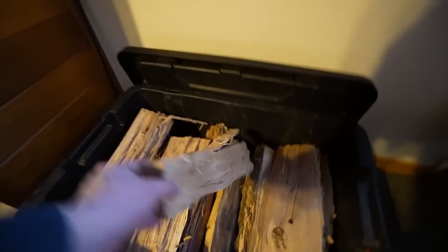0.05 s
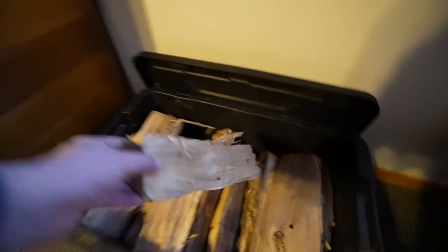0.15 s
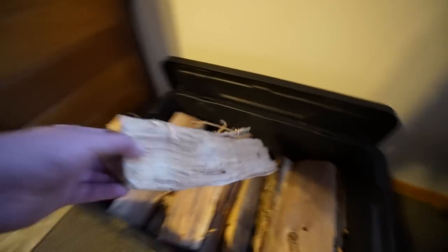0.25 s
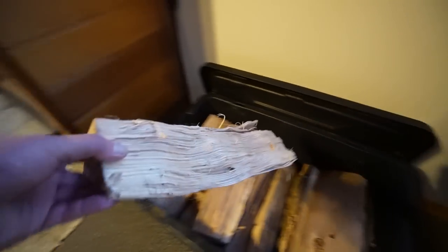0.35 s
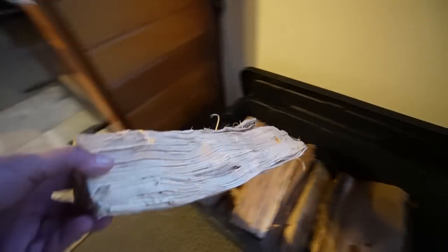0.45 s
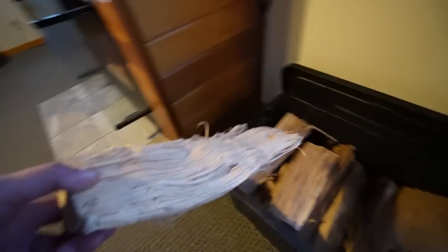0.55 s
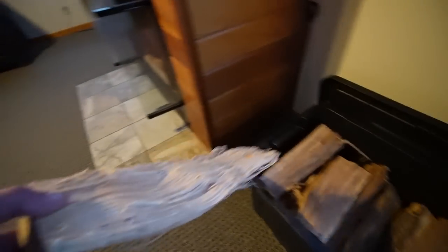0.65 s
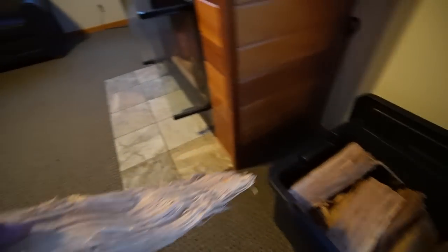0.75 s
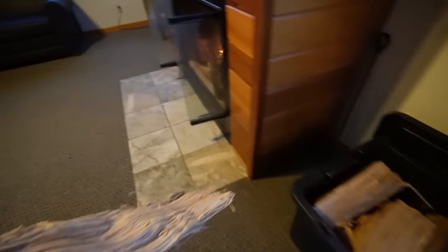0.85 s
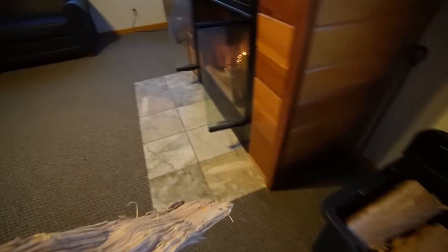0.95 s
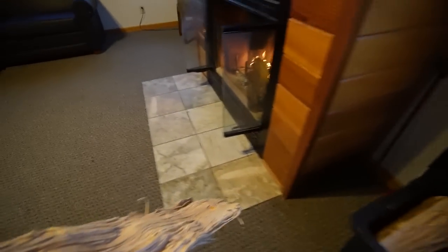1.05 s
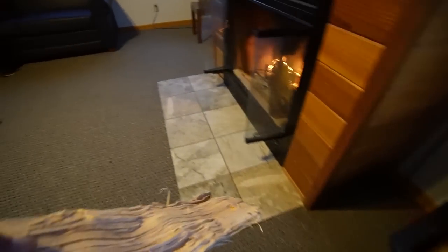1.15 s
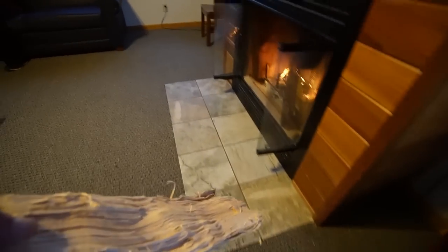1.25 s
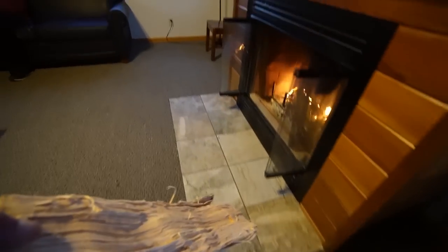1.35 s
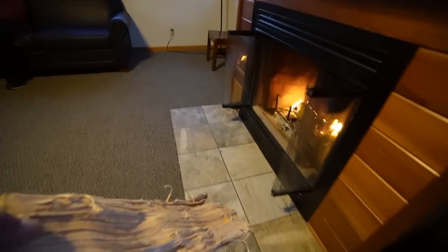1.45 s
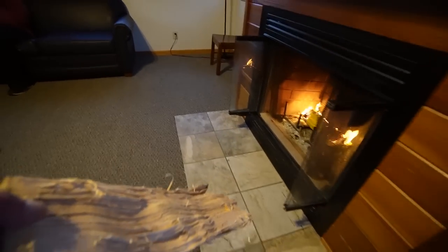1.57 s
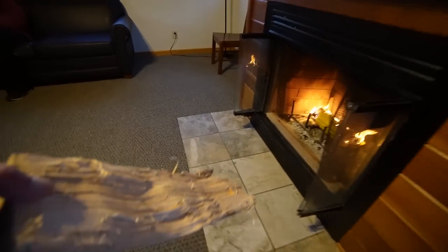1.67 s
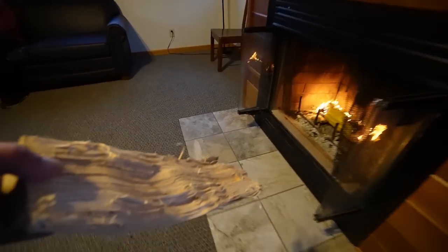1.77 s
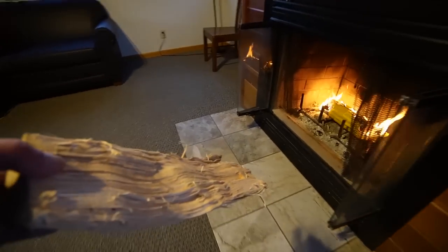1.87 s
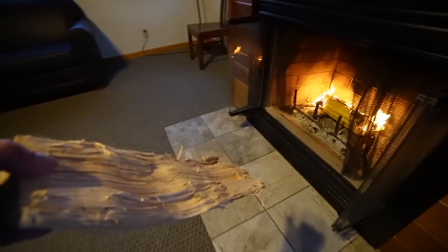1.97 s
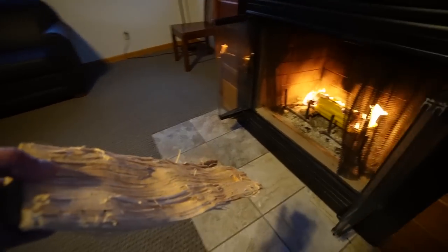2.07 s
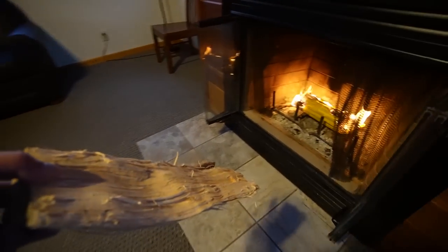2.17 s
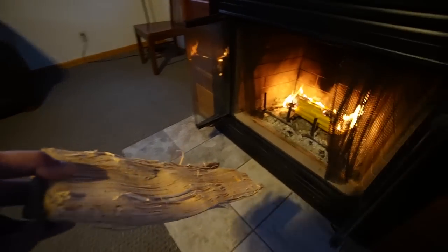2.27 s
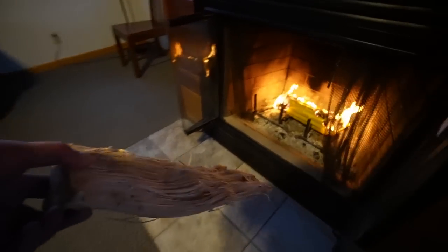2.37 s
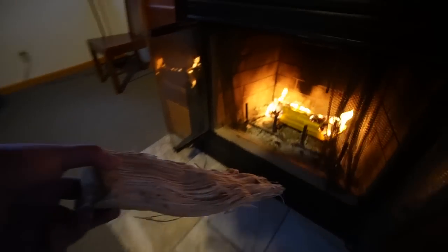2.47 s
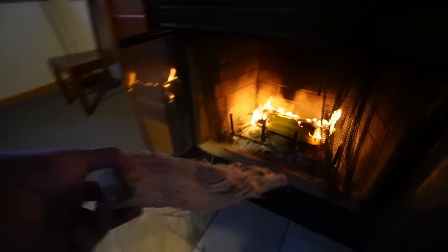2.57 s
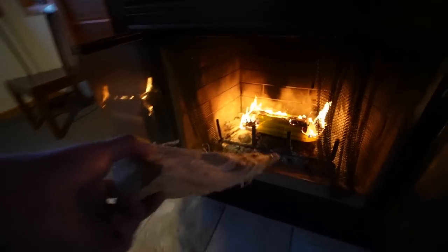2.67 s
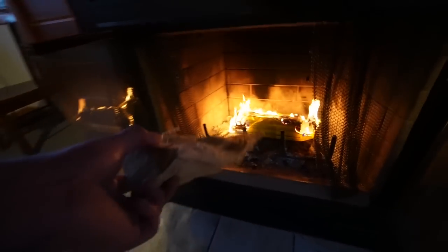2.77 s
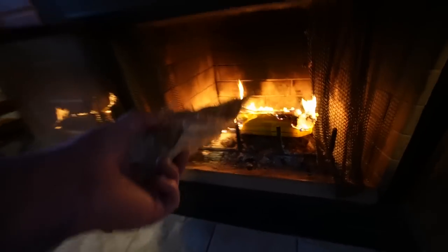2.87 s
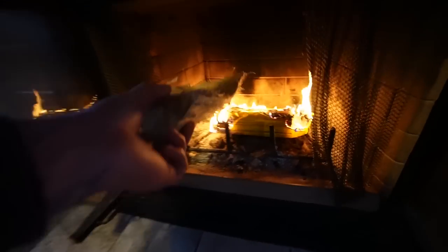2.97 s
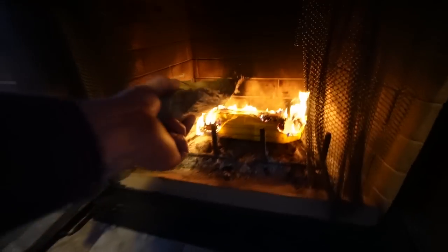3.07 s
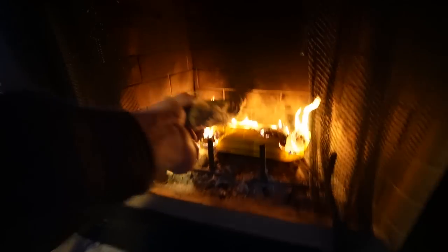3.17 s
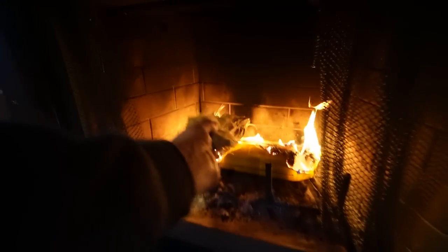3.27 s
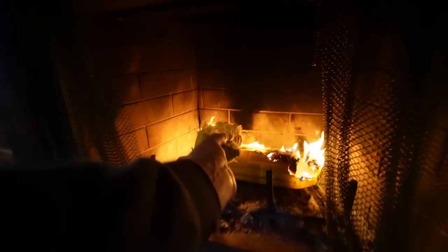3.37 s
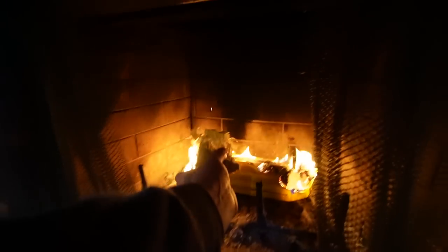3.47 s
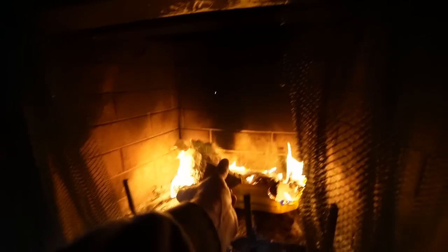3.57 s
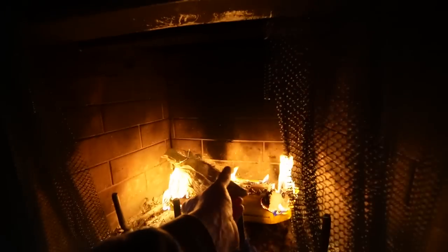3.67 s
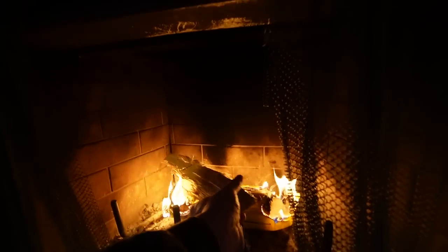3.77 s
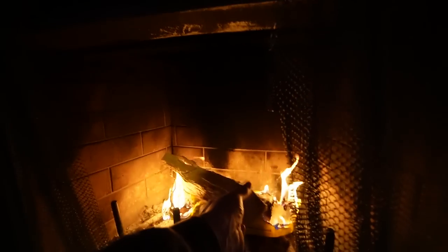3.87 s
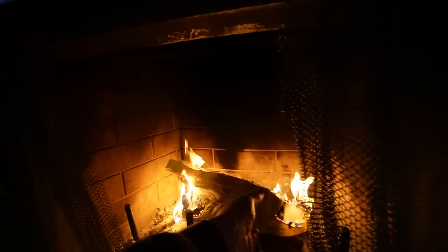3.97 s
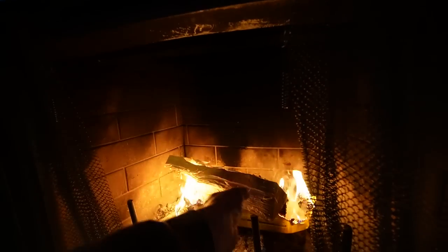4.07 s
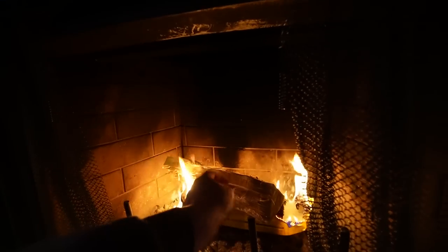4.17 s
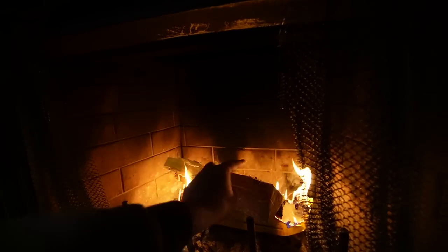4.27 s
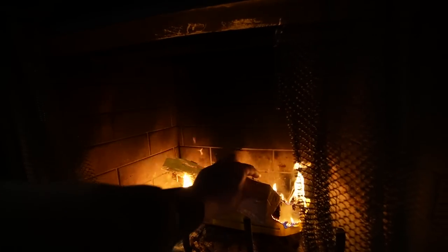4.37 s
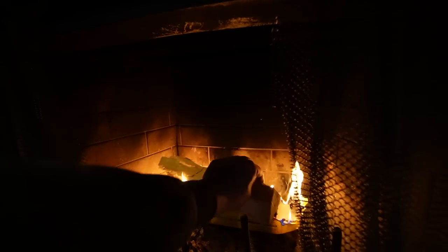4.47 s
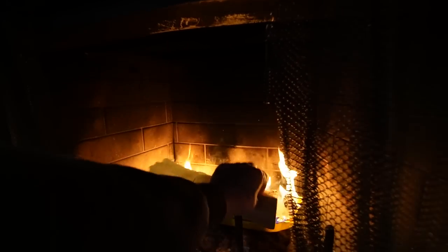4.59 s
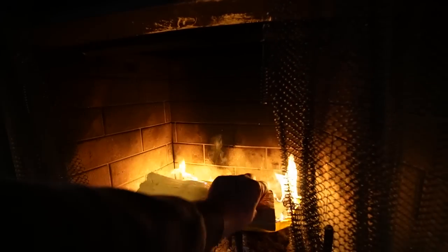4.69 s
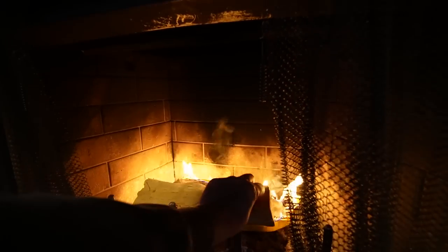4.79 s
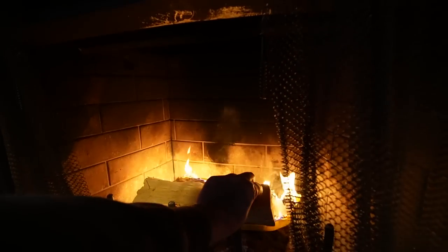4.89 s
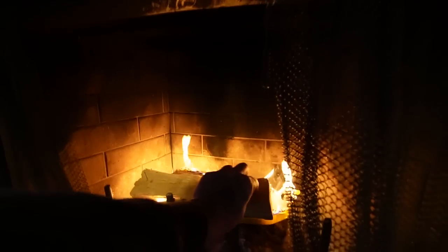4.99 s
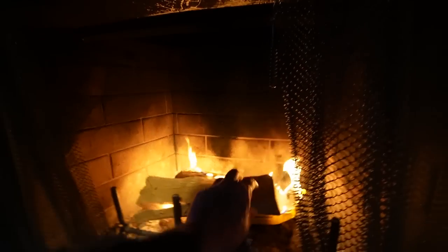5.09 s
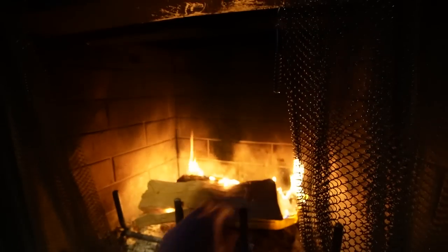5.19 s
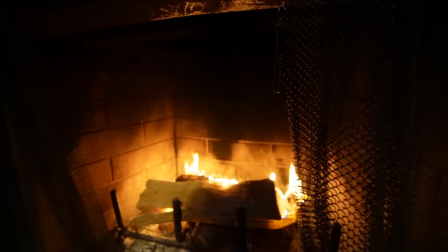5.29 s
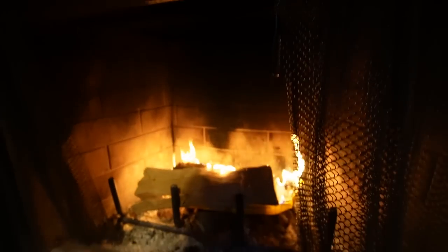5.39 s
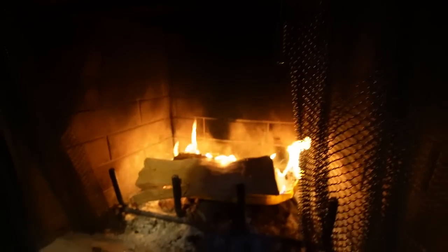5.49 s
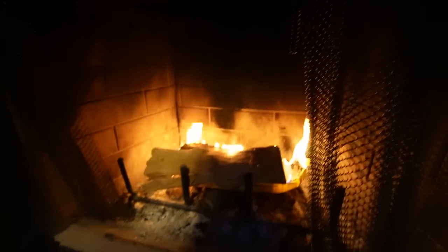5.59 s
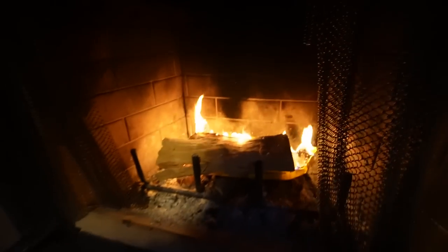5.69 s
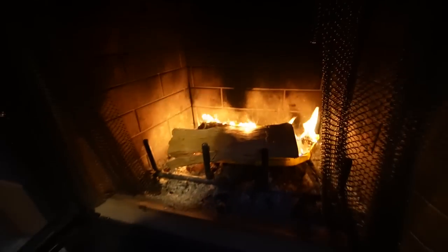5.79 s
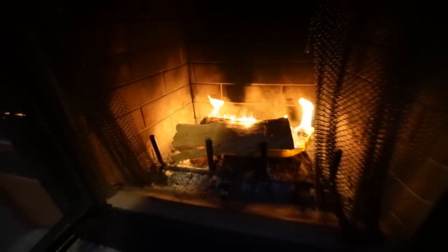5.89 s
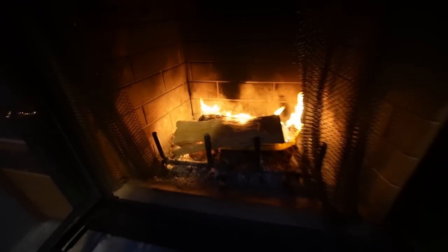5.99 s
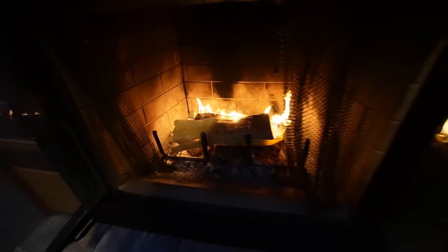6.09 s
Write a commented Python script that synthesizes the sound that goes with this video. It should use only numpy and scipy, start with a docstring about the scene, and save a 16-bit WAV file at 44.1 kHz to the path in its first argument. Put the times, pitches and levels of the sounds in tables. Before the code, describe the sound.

A dry split log clacks out of a bin, cloth swishes toward a crackling fire, then the log scrapes and knocks onto the burning grate.

```python
"""Log onto the fire

A split log is pulled from a bin, clacking on its neighbours, and carried to a burning fireplace.
Clacks, knocks, crackles: noise bursts through resonances; the log and sheet-metal firebox ring as modes.
Scrapes, fire and clothes: shaped noise under envelopes, over quiet air. A small living room answers most of it.
"""
import sys
import numpy as np
from scipy import signal
from scipy.fft import rfft, irfft, next_fast_len
from scipy.io import wavfile
from scipy.ndimage import map_coordinates

SR = 44100
rng = np.random.default_rng(int(sys.argv[2]) if len(sys.argv) > 2 else 0)


def put_to_file(sound):
    """Save the sound as 16-bit audio at rate SR, in the file named by the first command-line argument."""
    columns = np.atleast_2d(sound).T  # one column per channel
    safe = np.clip(columns, -1, 1)
    whole_steps = np.round(safe * 32767)
    wavfile.write(sys.argv[1], SR, whole_steps.astype(np.int16))


N = 270759  # samples

# All levels are relative.
# dry logs rub and strike each other in the bin: [t/s, level/dB, ring level/dB, contact t60/s]
CLACKS = [(.001, -38, -23, 0.48), (.037, -30.5, 2.5, 0.11), (0.055, -32.5, -0.5, 0.2),
          (.089, -29, 4, 0.089), (0.1662, -18.5, -19, 0.053), (0.1716, -13.5, -6.5, 0.058),
          (.191, -9.5, -4.5, 0.03), (.215, -20, -0.5, 0.032)]
# modes of the split log: [f/Hz, level/dB]
LOG_MODES = [(1087, -42.5), (1200, -37.5), (1518, -47.5), (1690, -58), (2299, -55), (2460, -60),
             (2503, -46), (2977, -69), (3198, -58), (3505, -64), (3989, -58), (4097, -71), (4307, -59),
             (4823, -71), (5060, -53), (5109, -57), (5335, -49), (5604, -51), (5965, -62), (6487, -58)]
# how long the log rings: [f/Hz, t60/s]
LOG_DECAY = [(1200, .15), (2500, .14), (6000, .1)]
# spectrum of the cracking contact: [f/Hz, level/dB]
CLACK_COLOUR = [(240, -66), (400, -35.5), (906, -16), (1200, -1.5), (1350, -9.5), (2020, -9.5), (2220, -3),
                (2750, -9), (4440, -8), (5350, -14.5), (6640, -16), (10700, -29), (16000, -44.5)]

# pushes of the log over wood and embers:
# [t/s, length/s, final level/dB, swell/dB, release t60/s, crunch over rasp/dB]
PUSHES = [(3.435, 0.37, -50, -2.5, .15, -19.5), (3.83, 0.077, -38.5, 8.5, .22, -15.5),
          (3.94, 0.073, -36, 8.5, 0.15, -14), (4.0, .11, -39.5, 2.5, 0.41, -6),
          (4.512, 0.036, -38, 13.5, .2, -15.5), (4.59, 0.15, -31.5, 16.5, 0.23, -16),
          (4.78, 0.07, -35, 4.5, 0.22, -13.5), (4.97, 0.15, -46.5, 6, 0.068, -13.5),
          (5.13, 0.036, -46, -4, 0.25, -9)]
PUSH_ATTACK_S = 0.004
# spectrum of the rasping grain: [f/Hz, level/dB]
RASP_COLOUR = [(400, -9.5), (900, -34), (1250, -7), (1600, -9), (2200, 0), (2750, 3), (3800, 2), (4700, 1),
               (6500, -0.5), (10000, -19), (16000, -53)]
# resonances of the sliding log that come and go as it catches: [f/Hz, width/Hz, level re rasp/dB]
CATCHES = [(1634, 140, -14.5), (2046, 200, -14), (2766, 180, -12), (3750, 310, -12.5), (4710, 190, -21.5)]
CATCH_RATE_HZ, CATCH_DEPTH_DB = 22, 7
# spectrum of crumbling embers: [f/Hz, level/dB]
CRUNCH_COLOUR = [(1500, -7), (4000, -7), (8000, 0.5), (11000, -6.5), (16000, -15)]
# wood and charcoal squeak as the log slides and settles: [t/s, length/s, f/Hz, width/Hz, level/dB]
SQUEAKS = [(3.728, 0.063, 1650, 200, -53.5), (3.829, 0.084, 4600, 910, -50), (3.893, 0.049, 1780, 350, -43),
           (3.905, 0.024, 2700, 600, -39), (3.97, 0.056, 1700, 300, -43), (4.682, 0.053, 1960, 380, -42.5),
           (4.735, 0.019, 4310, 450, -29.5), (4.842, .054, 3730, 1090, -38), (5.059, 0.051, 3710, 261, -42),
           (5.142, 0.025, 11750, 710, -45), (5.147, .022, 15000, 500, -43), (5.142, 0.057, 3970, 1400, -44)]

# a soft rub in the bin (the first two rows), then hollow knocks of wood and bumps on the hearth:
# [t/s, level/dB, f/Hz]
KNOCKS = [(0.496, -40, 1080), (0.505, -39, 1210), (1.072, -44, 730), (1.327, -43.5, 1170),
          (2.603, -37, 544), (2.868, -39.5, 230), (3.084, -28, 2370), (3.916, -18.5, 2500),
          (4.003, -30, 1850), (4.06, -23.5, 2200), (4.096, -22, 2630), (4.526, -30, 1940),
          (4.703, -19.5, 2070), (4.7592, -11.5, 1350), (4.7605, -20.5, 710), (4.821, -21, 2100),
          (4.878, -25, 1700), (5.658, -32.5, 1780)]
KNOCK_T60_AT_1KHZ_S, KNOCK_SLOPE = 0.039, 0.55  # deeper knocks last longer by this power

# jolts of the grate, each ringing the sheet-metal firebox: [t/s, level/dB, contact cutoff f/Hz]
JOLTS = [(2.873, -41, 228), (3.459, -34, 145), (4.007, -25.5, 900), (4.06, -36, 910),
         (4.095, -35, 1106), (4.489, -40, 404), (4.518, -34.5, 900), (4.735, -22, 715),
         (4.761, -32, 600), (4.778, -18.5, 167)]
# sheet-metal panel modes of the firebox: [f/Hz, level/dB]
PANEL_MODES = [(70.5, -1), (80, -5), (98, -4), (117, -3.5), (128, 1), (156, 0), (194, -3.5), (208, -6),
               (223, -3), (272, -6), (297, -0.5), (321, 2), (355, 2), (396, -9), (438, -20), (460, -5),
               (495, -4), (533, -0.5), (562, -18), (602, -6.5), (761, -1)]
# spectrum of the dense clang: [f/Hz, level/dB]
CLANG_COLOUR = [(30, -37.5), (65, 5.5), (130, 7), (250, -1.5), (460, 12.5), (650, -8), (1000, 0),
                (1500, -8), (3000, -41)]
# decay of panels and clang: [f/Hz, t60/s]
FIREBOX_DECAY = [(70, 0.7), (110, 1.1), (155, 1.66), (300, 0.78), (500, 0.43), (1000, 0.095)]

# dull thuds of the bin and of feet on the floor: [t/s, level/dB]
THUDS = [(.045, -35), (0.079, -43), (.19, -48), (1.072, -49), (2.048, -51), (2.875, -45)]
# floor resonances: [f/Hz, width/Hz, level/dB]
FLOOR = [(70, 46, -12.5), (126, 25, -14), (186, 20, 0), (252, 52, -5), (318, 145, -12.5)]

# the loudest dry ticks of the flames: [t/s, level/dB, f/Hz]
TICKS = [(1.5162, -32, 12500), (1.8272, -29, 8100), (1.9339, -29, 9550), (1.9664, -32, 8000),
         (2.2999, -34, 7550), (2.3835, -29, 7800), (2.7726, -32.5, 7800)]
# the loudest snaps of burning wood and splinters: [t/s, level/dB, f/Hz]
SNAPS = [(2.5552, -36, 4400), (2.863, -31, 5140), (2.9343, -32, 6100), (3.1386, -31, 4700),
         (3.1714, -30.5, 4620), (3.2202, -23, 4940), (3.238, -28.5, 4440), (3.4372, -26.5, 3540),
         (3.487, -28, 5900), (3.6198, -22, 5170), (3.681, -32, 5730), (3.7615, -26, 5040),
         (4.2294, -29.5, 5900), (4.3945, -39, 6300), (4.5479, -24, 2770), (4.568, -23.5, 2860),
         (4.7414, -14.5, 3900), (4.7522, -13, 3460), (4.775, -17.5, 3530), (4.7906, -24, 2940),
         (4.8369, -14.5, 3280), (4.8524, -21, 3760), (4.9212, -30, 4500), (5.6166, -32.5, 4640),
         (5.7224, -36.5, 3980), (5.836, -40, 5100)]
TICK_T60_S, SNAP_T60_S = 0.001, 0.022
# lesser ticks at random, riding on the fizz: [rate/Hz, level re fizz/dB, f/Hz]
SMALL_TICKS = (12, 27.3, 6000)
# lesser snaps at random, riding on the sizzle: [rate/Hz, level re sizzle/dB, f/Hz]
SMALL_SNAPS = (8, 18.3, 5900)
SCATTER_OCTAVES = 0.21  # either way, from one small crackle to the next

# the fire grows as one nears it; its fizz dulls under the fresh log: [t/s, sizzle level/dB, fizz level/dB]
FIRE = [(.9, -89, -86), (1.5, -92.5, -77.5), (1.85, -59, -64), (2.35, -59, -61.5), (2.55, -60, -79),
        (2.85, -55.5, -64), (3.25, -53, -63), (3.38, -60, -62), (4.4, -64, -65), (5.35, -65.5, -72.5),
        (5.781, -58.5, -85), (6.14, -61, -90)]
# spectrum of the sizzle: [f/Hz, level/dB]
SIZZLE_COLOUR = [(410, -39), (700, -38), (1140, -25), (2160, 0.5), (2430, -5), (2660, 1.5), (4670, 2),
                 (9860, -10), (14200, -47), (16000, -33)]
# spectrum of the fizz: [f/Hz, level/dB]
FIZZ_COLOUR = [(4000, -36.5), (7000, 2.5), (10000, -1), (14000, -6), (16000, -16)]

# clothes swish with each step and with the reach:
# [t/s, length/s, final level/dB, swell/dB, release t60/s, brushing over rustle/dB]
SWISHES = [(.3, .2, -65.5, 1, 0.36, 4.5), (1.0, 0.099, -63, 11, 3.9, 0.5), (1.7, 0.43, -57, 11, 1.02, -0.5),
           (2.42, 0.032, -57.5, 3, 0.73, 2), (2.59, 0.17, -58, -3.5, 0.98, -2),
           (3.05, 0.15, -65, 4, 3.8, 10)]
SWISH_ATTACK_S = 0.0083
# spectrum of the rustle: [f/Hz, level/dB]
RUSTLE_COLOUR = [(35, -55), (60, -24.5), (163, 0.5), (206, -7), (334, -3.5), (501, -10.5), (826, -10),
                 (980, -12), (2500, -12.5), (3250, -20), (5500, -120)]
# spectrum of the brushing: [f/Hz, level/dB]
BRUSH_COLOUR = [(800, -29.5), (2200, -1), (4500, -3), (9000, -17), (15000, -21)]

# spectrum of the room's own hush: [f/Hz, level/dB]
AIR_COLOUR = [(15, -37), (25, -4), (130, -2.5), (166, 2), (212, -2.5), (476, -8), (516, -12.5), (818, -8.5),
              (1130, -13), (1370, -13.5), (1840, -3), (2550, -9.5), (3080, -3.5), (3620, -13.5),
              (16000, -49.5)]
# a thin steady hiss, left behind on the way to the hearth
HISS_DB, HISS_UNTIL_S, HISS_FADE_DB_PER_S = -66.5, 2.2, 5

# how long the walls answer: [f/Hz, t60/s]
ROOM_DECAY = [(200, .45), (1200, .31), (2700, .5), (5000, .34), (10000, .26), (15000, .16)]
# stereo width at the source, before any diffusion: [f/Hz, side re mid/dB]
WIDTH = [(100, -38), (250, -26.5), (500, -21), (1000, -19), (2000, -18), (4000, -11.5), (8000, -7.5),
         (13000, -4)]
TOP_HZ = 16200


def clacks():
    """Each contact in the bin is a rough crack that leaves the dry log ringing."""
    out, t = np.zeros((2, N)), np.arange(SR // 2) / SR
    for s, db, ring_db, t60_s in CLACKS:
        contact = fade(t, t60_s)
        crack = noise(CLACK_COLOUR, len(t), contact) * np.sqrt(np.mean(contact ** 2))
        modes = ring(LOG_MODES, LOG_DECAY, t, scatter_db=1.5, blur_hz=14)
        add(out, s, amp(db) * (amp(-4.0) * crack + amp(ring_db - 12) * modes))
    return room(out, wet_db=-7)


def scrape():
    """Rough grain catches in quick slips that stir the log's resonances, while brittle embers crumble under it."""
    rasp, crunch = strokes(PUSHES, PUSH_ATTACK_S)
    grip = grains(rate_hz=2400, spread_db=1.5) * amp(2.5 * wobble(120))
    slips = amp(-3.5) * noise(RASP_COLOUR, N, grip)
    for hz, width_hz, db in CATCHES:
        catch = grip * amp(CATCH_DEPTH_DB * wobble(CATCH_RATE_HZ))
        stirred = catch * rng.standard_normal((2, N))
        slips = slips + amp(db) * ports(stirred, lambda f: resonance(f, hz, width_hz) ** 2)
    embers = noise(CRUNCH_COLOUR, N, grains(rate_hz=4000, spread_db=1.5))
    return room(rasp * slips + amp(3.0) * crunch * embers, wet_db=-12.5)


def squeaks():
    """Wood sticks and slips fast enough to give short unsteady notes: narrow noise under a half-sine."""
    out = np.zeros((2, N))
    for s, length_s, hz, width_hz, db in SQUEAKS:
        size = max(int(length_s * SR), 2)
        note = ports(rng.standard_normal((2, size)), lambda f: resonance(f, hz, width_hz) ** 2)
        add(out, s, amp(db + 2.0) * note * np.sin(np.linspace(0, np.pi, size)))
    return room(out, wet_db=-12.0)


def rub_and_knocks():
    """A soft rub as two bursts, then knocks and bumps: dull notes, longer the deeper they are."""
    out = np.zeros((2, N))
    for s, db, hz in KNOCKS:
        t60_s = KNOCK_T60_AT_1KHZ_S * (1000 / hz) ** KNOCK_SLOPE
        note = burst(hz, t60_s, breadth=0.4, low_cut=0.11, high_cut=2.1, spike=5.2)
        add(out, s + 0.0007, amp(db - 8) * note)
    return room(out, wet_db=-6.5)


def firebox():
    """Grate jolts: panel modes and a dense clang; soft contact passes only the lows."""
    out, t = np.zeros((2, N)), np.arange(SR) / SR
    for s, db, cutoff_hz in JOLTS:
        panels = amp(-10.5) * ring(PANEL_MODES, FIREBOX_DECAY, t, scatter_db=1.0, blur_hz=0.3)
        clang = amp(-10.5) * dying(noise(CLANG_COLOUR, len(t)), FIREBOX_DECAY)
        # two-pole low-pass
        contact = lambda f: 1 / (1 - (f / cutoff_hz) ** 2 + 1j * np.sqrt(2) * f / cutoff_hz)
        add(out, s, amp(db) * filtered(panels + clang, contact))
    return out


def floor_response(f):
    """Parallel floor resonances of alternating sign."""
    total = 0
    for k, (hz, width_hz, db) in enumerate(FLOOR):
        total = total + (-1) ** k * amp(db) * resonance(f, hz, width_hz)
    return total


def thuds():
    """Soft blows hum briefly in the floor."""
    out, t = np.zeros((2, N)), np.arange(SR // 2) / SR
    for s, db in THUDS:
        blow = ports(rng.standard_normal((2, len(t))) * fade(t, 0.44), floor_response)
        add(out, s, amp(db - 2.0) * blow / np.abs(blow).max())
    return out


def crackles():
    """Single ticks and longer snaps of the burning wood, each a burst of impulses through a resonance."""
    ticks, snaps = np.zeros((2, N)), np.zeros((2, N))
    sizzle, fizz = fire_levels()
    for s, db, hz in list(SNAPS) + stray(SMALL_SNAPS, sizzle):
        snap = burst(hz, SNAP_T60_S, breadth=0.81, low_cut=0.31, high_cut=0.91, spike=3.7)
        add(snaps, s + 0.0007, amp(db - 6.0) * snap)
    for s, db, hz in list(TICKS) + stray(SMALL_TICKS, fizz):
        tick = burst(hz, TICK_T60_S, breadth=0.42, low_cut=0.091, high_cut=1.8, spike=4.5)
        add(ticks, s + 0.0018, amp(db + 0.5) * tick)
    return room(ticks, wet_db=-7) + room(snaps, wet_db=-6.5)


def stray(kind, level):
    """Rows [t/s, level/dB, f/Hz] of chance crackles whose strength follows a layer of the fire."""
    rate_hz, over_db, centre_hz = kind
    draws = rng.random((200, 2))
    times = np.cumsum(-np.log(1 - draws[:, 0])) / rate_hz
    rows = []
    for s, u in zip(times, 2 * draws[:, 1] - 1):
        if s * SR < N - SR // 100:
            db = 20 * np.log10(level[int(s * SR)]) + over_db
            rows.append((s, db, centre_hz * 2 ** (SCATTER_OCTAVES * u)))
    return rows


def fire_levels():
    """Gain of the sizzle and of the fizz at every sample."""
    s, *columns = np.transpose(FIRE)
    return [amp(np.interp(np.arange(N) / SR, s, db)) for db in columns]


def fire():
    """Sap and bark sizzle in dense grains, with a sparser bright fizz on top."""
    sizzle, fizz = fire_levels()
    flicker = amp(1.3 * wobble(12) + 1.8 * wobble(70))
    body = noise(SIZZLE_COLOUR, N, grains(rate_hz=2700, spread_db=2.5) * flicker)
    sparks = noise(FIZZ_COLOUR, N, 0.663 + grains(rate_hz=280, spread_db=11.5))
    return room(amp(-0.5) * sizzle * body + fizz * sparks, wet_db=-4.5)


def clothes():
    """Cloth rubs with the walk and the reach: a low rustle and a brighter brushing, both noise."""
    rustle, brush = strokes(SWISHES, SWISH_ATTACK_S)
    folds = amp(3 * wobble(40))
    brushing = diffuse(brush * noise(BRUSH_COLOUR, N, folds), side_db=-7)
    return rustle * noise(RUSTLE_COLOUR, N, folds) + brushing


def hush():
    """Quiet room air with one narrow hissing resonance."""
    late_s = np.maximum(np.arange(N) / SR - HISS_UNTIL_S, 0)
    hiss_gain = amp(HISS_DB - HISS_FADE_DB_PER_S * late_s)
    hiss = ports(rng.standard_normal((2, N)), lambda f: resonance(f, 3050, 172))
    return amp(-66.0) * noise(AIR_COLOUR, N) + hiss_gain * hiss


def room(x, wet_db):
    """The sound plus the answer of the walls: decaying noise after a short gap."""
    tail = dying(noise([(100, 2.5), (5000, -9.5), (16000, -0.5)], SR // 2), ROOM_DECAY)
    tail[:, :SR // 300] = 0
    tail = tail / np.linalg.norm(tail[0])
    return x + amp(wet_db) * signal.fftconvolve(x.mean(0)[None], tail, axes=1)[:, :N]


def strokes(rows, attack_s):
    """Rubbing sets in, swells with the pressure and dies away: gains of its main and its brighter layer."""
    main, bright = np.zeros(N), np.zeros(N)
    for s, length_s, db, swell_db, release_s, bright_db in rows:
        t = np.maximum(np.arange(N) / SR - s, 0)
        pressure = amp(db - swell_db * np.maximum(1 - t / length_s, 0))
        gain = np.minimum(t / attack_s, 1) * pressure * fade(np.maximum(t - length_s, 0), release_s)
        main += gain ** 2
        bright += (amp(bright_db) * gain) ** 2
    return np.sqrt(main), np.sqrt(bright)


def burst(hz, t60_s, breadth, low_cut, high_cut, spike):
    """One sharp break, then a dying spray of impulses, through a broad resonance; starts near rms 1."""
    t = np.arange(SR // 4) / SR
    envelope = fade(t, t60_s)
    spray = rng.standard_normal((2, len(t))) * envelope
    spray[0, 0] += spike
    skirts = lambda f: (1j * f / (1j * f + low_cut * hz)) ** 3 / (1 + 1j * f / (high_cut * hz))
    x = ports(spray, lambda f: resonance(f, hz, breadth * hz) * skirts(f))
    return x * np.sqrt(np.mean(envelope ** 2))


def ring(modes, decay, t, scatter_db, blur_hz):
    """Modes struck at new strengths, their pitch blurred by loose contact, starting near rms 1."""
    draws = rng.standard_normal((len(modes), 2))
    drift = np.cumsum(rng.standard_normal(len(t))) * np.sqrt(2 * np.pi * abs(blur_hz) / SR)
    total = np.zeros(len(t))
    for (hz, db), (a, b) in zip(modes, draws):
        tone = np.sin(2 * np.pi * hz * t + np.pi * b + drift)
        total += amp(db + scatter_db * a) * tone * fade(t, along(decay, hz))
    onset = 1 - np.exp(-t / 0.00086)
    return total * onset / np.linalg.norm(amp(np.array(modes)[:, 1]))


def grains(rate_hz, spread_db):
    """Envelope of many tiny fractures, a few of them much stronger than the rest, rms 1."""
    size = amp(spread_db * np.minimum(rng.exponential(size=N), 4))
    starts = size * (rng.random(N) < rate_hz / SR)
    return unit(signal.lfilter([1], [1, -np.exp(-1 / (0.0021 * SR))], starts))


def dying(x, decay):
    """Each frequency of x dies at its own speed."""
    hz, t, z = signal.stft(x, SR, nperseg=256)
    z = z * np.exp(-np.log(1000) * t / along(decay, hz)[:, None])
    return signal.istft(z, SR, nperseg=256)[1][:, :x.shape[-1]]


def noise(colour, size, envelope=1):
    """Stereo noise with a spectrum, its excitation shaped by an envelope."""
    return ports(envelope * rng.standard_normal((2, size)), lambda f: causal(amp(along(colour, f))))


def ports(pair, response):
    """Two unrelated signals coloured and blended into two close microphones, rms 1."""
    mid_side = lambda f: response(f) * np.array([np.ones(len(f)), amp(along(WIDTH, f))])
    mid, side = filtered(pair, mid_side)
    return unit(np.array([mid + side, mid - side]))


def diffuse(x, side_db):
    """Scale the side by side_db: sound from all round differs more between the microphones."""
    return x.mean(0) + amp(side_db) * (x - x.mean(0))


def resonance(f, hz, width_hz):
    """A causal band-pass."""
    return 1j * f * width_hz / (hz * hz - f * f + 1j * f * width_hz)


def causal(gain):
    """Minimum-phase response with this gain: it starts only once it is struck."""
    cepstrum = irfft(np.log(np.maximum(gain, 1e-6)))
    half = len(cepstrum) // 2
    fold = np.r_[1, np.full(half - 1, 2), 1, np.zeros(half - 1)]
    return np.exp(rfft(cepstrum * fold))


def filtered(x, response):
    """x times a response of frequency."""
    n = x.shape[-1]
    m = next_fast_len(n + SR // 8)
    return irfft(rfft(x, m) * response(np.fft.rfftfreq(m, 1 / SR)), m)[..., :n]


def fade(t, t60_s):
    """Decay by 60 dB in t60_s, at least 1 ms."""
    return np.exp(-np.log(1000) * t / max(t60_s, 1e-3))


def wobble(rate_hz):
    """A smooth random curve, rate_hz knots a second."""
    knots = rng.standard_normal(int(N * rate_hz / SR) + 4)
    return map_coordinates(knots, [np.arange(N) * rate_hz / SR])


def along(points, hz):
    """[f/Hz, value] points read on a log axis."""
    f, v = np.transpose(points)
    return np.interp(np.log(hz + 1), np.log(f), v)


def add(track, s, x):
    """Mix x into the track from time s on."""
    start = max(round(s * SR), 0)
    track[..., start:start + x.shape[-1]] += x[..., :N - start]


def amp(db):
    """Decibels to gain."""
    return 10 ** (np.asarray(db) / 20)


def unit(x):
    """Scale to rms 1."""
    return x / np.sqrt(np.mean(x ** 2) + 1e-20)


def scene():
    """Everything at the two microphones."""
    log = clacks() + scrape() + squeaks() + rub_and_knocks()
    contacts = log + firebox() + thuds() + crackles()
    return contacts + diffuse(fire(), side_db=1.0) + diffuse(clothes() + hush(), side_db=8.5)


def record(dry):
    """The left port is a little brighter; nothing is kept above the band limit."""
    left_re_right = [(8500, 0.074), (13000, 1.9)]  # [f/Hz, level/dB]
    tilt = lambda f: amp(np.array([along(left_re_right, f), -along(left_re_right, f)]) / 2)
    return filtered(filtered(dry, tilt), lambda f: f < TOP_HZ)


dry = scene()
out = record(dry)
put_to_file(out)
```